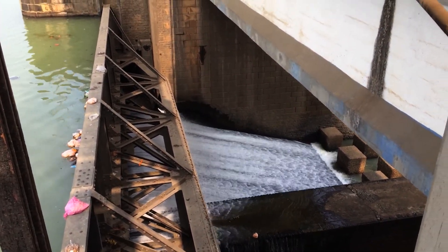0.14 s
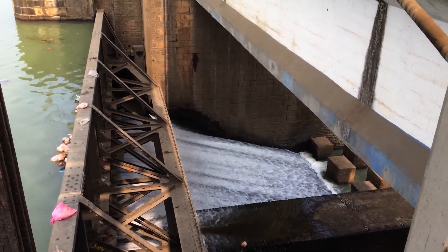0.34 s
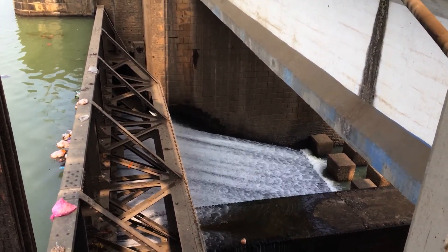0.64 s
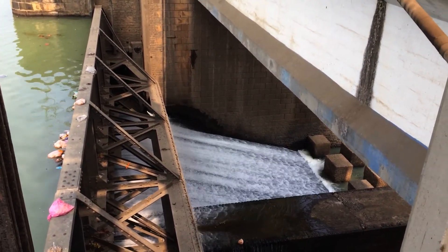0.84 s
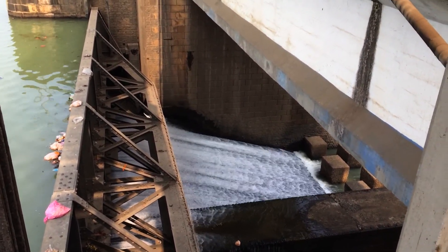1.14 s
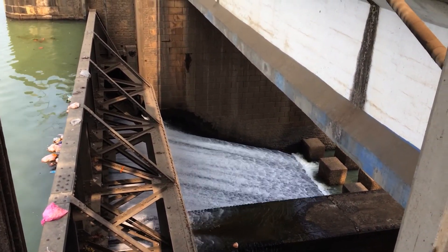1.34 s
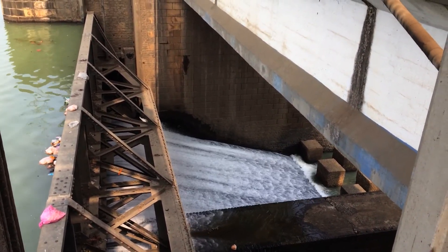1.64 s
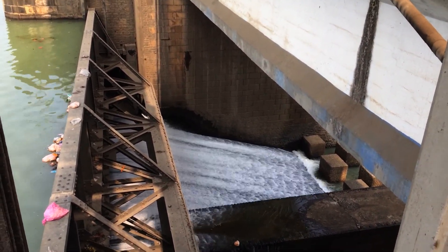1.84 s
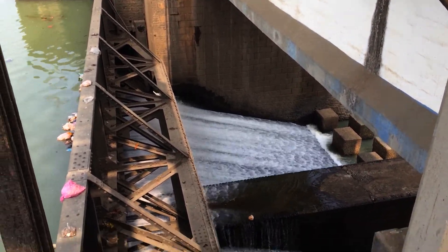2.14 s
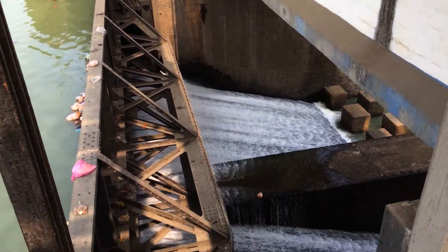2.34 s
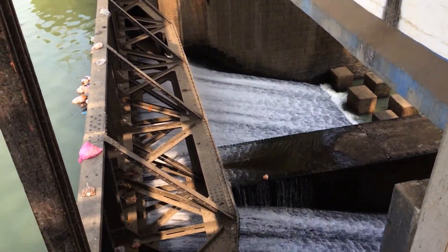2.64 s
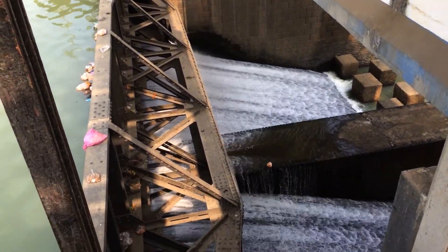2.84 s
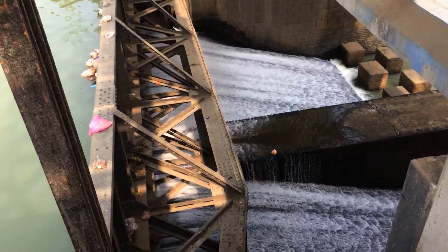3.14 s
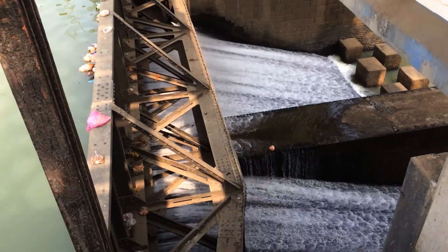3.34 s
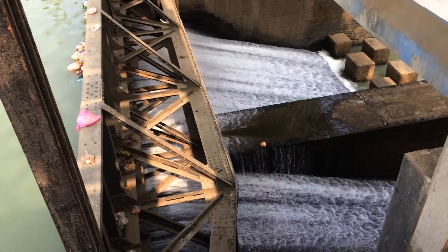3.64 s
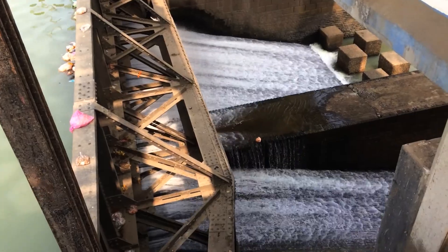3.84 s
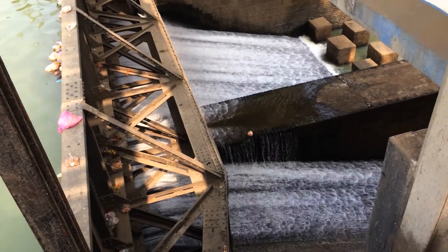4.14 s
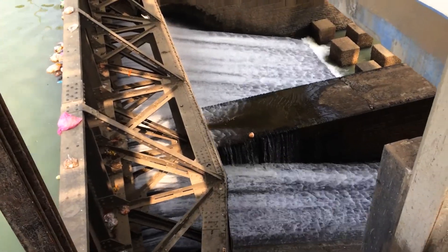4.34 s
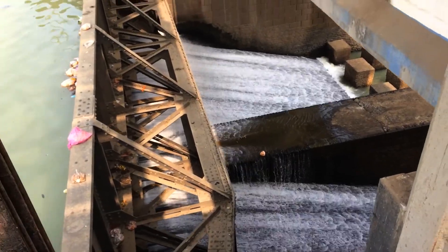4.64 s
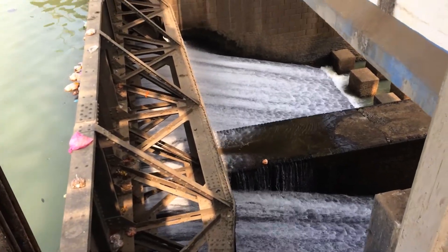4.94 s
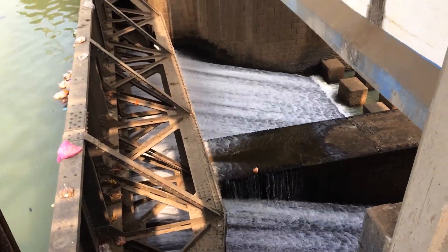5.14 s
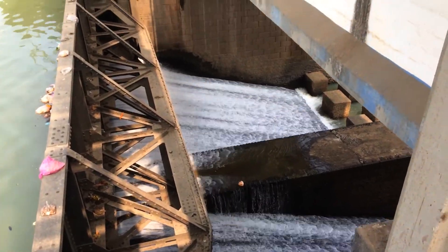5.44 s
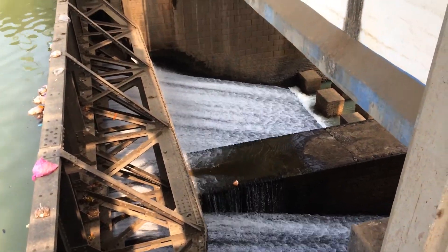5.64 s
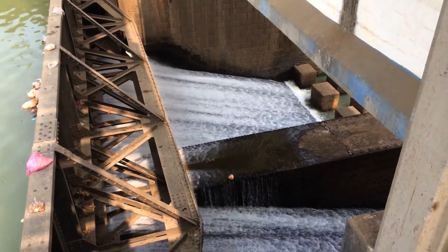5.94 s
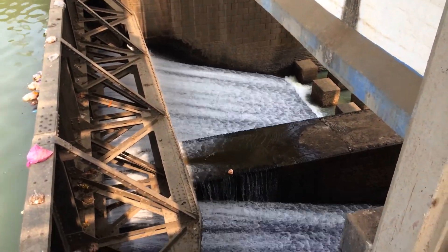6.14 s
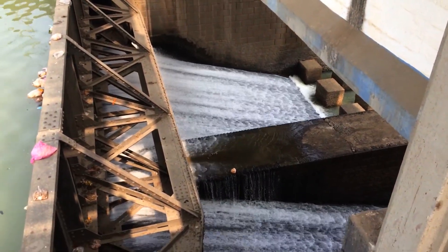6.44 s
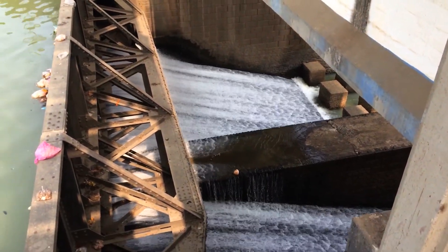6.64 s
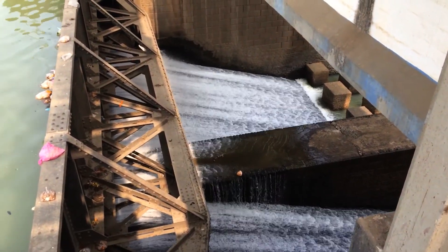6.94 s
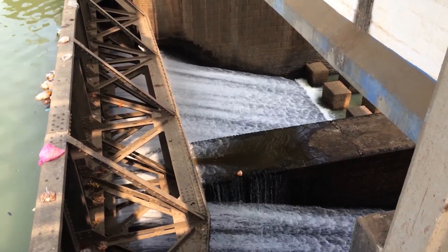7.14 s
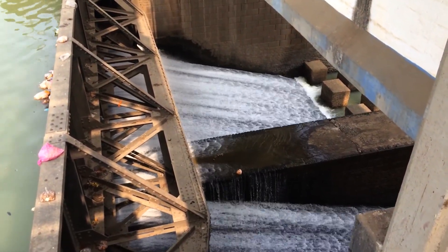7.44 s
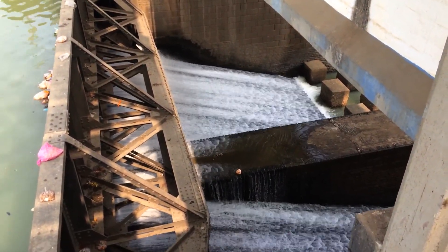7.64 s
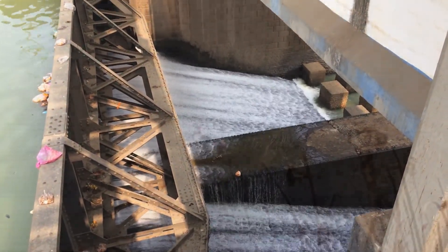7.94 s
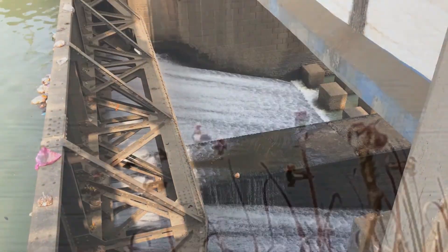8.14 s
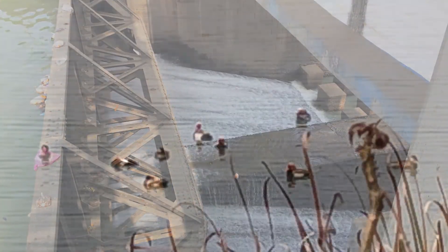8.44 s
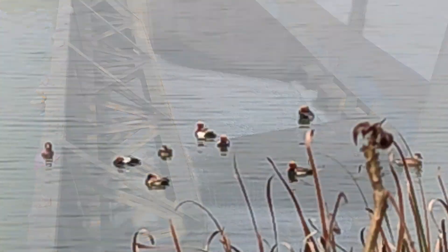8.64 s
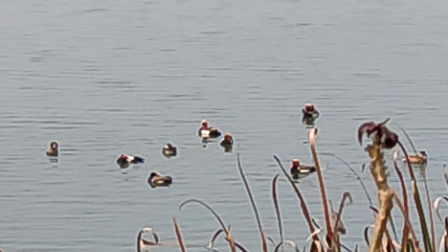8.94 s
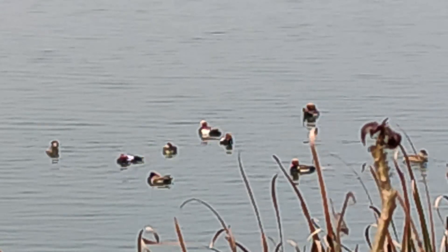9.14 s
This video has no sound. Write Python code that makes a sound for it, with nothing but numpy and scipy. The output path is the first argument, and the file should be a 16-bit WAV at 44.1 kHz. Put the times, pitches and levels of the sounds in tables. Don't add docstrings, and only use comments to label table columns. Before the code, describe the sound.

From 0 s, a loud, dense roar of water plunges down a concrete spillway between piers, covered by bright, fine spray hiss. It is slightly stronger in the first half second, with small splashes near 0.1 and 0.3 s, then very steady. Irregular low gusts thump the microphone throughout, heaviest from 2 to 3.3 s and peaking near 2.8 s, while a low hollow boom swells between the piers. From 2.2 to 6 s the hiss grows gradually brighter. At 8.3 s the water cuts off abruptly, leaving near silence until 8.6 s. Then a very quiet lake: soft wind rumble, distant lapping hush, faint steady motor hum and a thin, fading high insect band. Tiny distant birds peep and glide from 8.9 to 9.15 s, with one dry reed tick at 9.0 s. Nearly mono, with slight flickering compression holes and brief side-to-side patches in the highs.

```python
import sys
import numpy as np
from scipy import signal
from scipy.fft import rfft, irfft
from scipy.io import wavfile
from scipy.ndimage import uniform_filter1d

SR = 44100
rng = np.random.default_rng(int(sys.argv[2]) if len(sys.argv) > 2 else 0)


def ratio(d):
    e = np.asarray(d, float) / 20
    return 10 ** e


def dump(signal):
    limited = np.clip(np.atleast_2d(signal).T, -1, 1)
    pcm = np.round(limited * 32767).astype(np.int16)
    wavfile.write(sys.argv[1], SR, pcm)


N = 410130
LAKE_STARTS_S = 8.6005
FRAME = 1024


def rms_one(x):
    return x / np.sqrt(np.mean(x ** 2) + 1e-20)


def drift(rate):
    every, settle = 40, 2000
    r = np.exp(-2 * np.pi * rate * every / SR)
    coarse = rng.standard_normal(N // every + settle + 2)
    slow = signal.lfilter([1], [1, -2 * r, r * r], coarse)[settle:]
    return np.interp(np.arange(N) / every, np.arange(len(slow)), rms_one(slow))


def coloured(x, spectrum):
    hz = np.fft.rfftfreq(len(x), 1 / SR) + 1e-3
    points = np.array(spectrum)
    level_db = np.interp(np.log(hz), np.log(points[:, 0]), points[:, 1], left=-90)
    return rms_one(irfft(rfft(x) * ratio(level_db), len(x)))


def evened(x, seconds):
    span = int(seconds * SR)
    power = uniform_filter1d(uniform_filter1d(x ** 2, span), span)
    return rms_one(x / np.sqrt(power + .05))


def ramp(start, end):
    return np.clip((np.arange(N) / SR - start) / (end - start), 0, 1)


def bumps(events, seconds, rest_db):
    bass_rise_s = .08
    t = np.arange(0, N + 64, 64) / SR
    power = ratio(rest_db) ** 2
    for s, db in events:
        power = power + ratio(db) ** 2 * np.exp(-((t - s) / seconds) ** 2)
    gain = np.sqrt(power) * (1 - .7 * np.exp(-t / bass_rise_s))
    return np.interp(np.arange(N) / SR, t, gain)


def churn(grain_share, per_s, spread_db, patchy_db, surge):
    sizes = ratio(spread_db * np.minimum(rng.exponential(1, N), 4)) * rng.choice([-1, 1], N)
    bursts = rms_one(sizes * (rng.random(N) < per_s / SR))
    blend = np.sqrt(grain_share) * bursts + np.sqrt(1 - grain_share) * rng.standard_normal(N)
    source = rfft(blend)
    octave = np.log2(np.fft.rfftfreq(N, 1 / SR) + 1)
    out = np.zeros(N)
    for centre in range(7, 15):
        weight = np.cos(np.pi / 2 * np.clip(octave - centre, -1, 1)) ** 2
        out += irfft(source * weight, N) * ratio(patchy_db * drift(15) + surge)
    return out


def plunge_roar(surge, turn):
    # frequency in Hz, level in dB per Hz.
    roar_colour = [(110, -26), (190, 0), (236, -7), (303, -1.5), (409, -7.5), (642, -4.5), (1100, -4),
                   (1520, -3), (2000, -4), (3000, -7.5), (5000, -12), (6500, -26), (11000, -89.5)]
    # time in seconds, lift over the roar in dB.
    splashes = [
        (.105, 1.5),
        (.27, 1.0),
    ]
    roar_db, lean_db, lean_s, splash_s = -32, 1.5, .41, .02
    t = np.arange(N) / SR
    level_db = roar_db + lean_db * np.exp(-t / lean_s) + .5 * turn
    for s, db in splashes:
        level_db += db * np.exp(-((t - s) / splash_s) ** 2)
    return coloured(churn(.28, 3000, 3.35, patchy_db=.68, surge=surge), roar_colour) * ratio(level_db)


def spray_hiss(surge, turn):
    # frequency in Hz, level in dB per Hz.
    spray_colour = [(1760, -12.5), (3000, -5.5), (4500, -5), (5600, -4.5), (7000, -4.5), (10300, -6.5),
                    (12000, -8), (14200, -10), (15000, -12), (16000, -14)]
    spray_db, turn_db = -33, 1.5
    spray = coloured(churn(.2, 9000, 4.8, patchy_db=.5, surge=surge), spray_colour)
    return spray * ratio(spray_db + turn_db * turn)


def gust_thuds():
    # frequency in Hz, level in dB per Hz.
    thud_colour = [(11, -48), (18, -19.5), (35, -11.5), (59, 0.5), (108, 0), (135, -2.5), (170, -26),
                   (290, -89)]
    # time in seconds, peak level in dB.
    gusts = [(0.26, -36.5), (0.53, -36), (0.64, -37.5), (0.91, -39), (1.18, -36.0), (1.49, -36),
             (1.62, -35.0), (1.79, -38.2), (2.03, -34.5), (2.16, -31.5), (2.32, -33), (2.44, -35),
             (2.64, -32.7), (2.79, -28.5), (2.99, -35.5), (3.24, -32.7), (3.67, -37.9), (3.75, -38),
             (3.91, -38.5), (4.46, -33), (5.0, -34), (5.14, -38), (5.22, -38.3), (5.65, -34), (6.18, -38.5),
             (6.26, -36), (6.44, -41), (6.85, -34.5), (7.66, -38.5), (7.96, -34.7)]
    eddies = rng.standard_normal(N) * ratio(2 * drift(25))
    return evened(coloured(eddies, thud_colour), .097) * bumps(gusts, seconds=.035, rest_db=-42)


def pier_boom():
    # frequency in Hz, level in dB per Hz.
    boom_colour = [(74, -29.5), (125, 0.5), (179, -2), (230, -12), (300, -36), (510, -120)]
    # time in seconds, peak level in dB.
    swells = [(.57, -38), (1.22, -36.5), (1.45, -39), (2.0, -39), (2.33, -34), (2.8, -37), (2.89, -37),
              (3.41, -36.5), (4.48, -38.5), (6.01, -38), (6.41, -36.5), (6.84, -36.5), (7.09, -39.5),
              (7.67, -40), (8.05, -36), (8.31, -36.5)]
    boom = evened(coloured(rng.standard_normal(N), boom_colour), .081)
    return boom * bumps(swells, seconds=.03, rest_db=-42)


def spillway():
    turn = ramp(2.2, 6.0)
    surge = .2 * drift(6)
    return plunge_roar(surge, turn) + spray_hiss(surge, turn) + gust_thuds() + pier_boom()


def side_patches():
    # centre in seconds, low edge in Hz, high edge in Hz.
    patches = [(0.187, 4700, 6220), (0.651, 5730, 6860), (0.884, 4310, 6320), (1.023, 8330, 9650),
               (1.302, 5680, 7590), (1.603, 6810, 8330), (1.766, 10290, 13820), (2.207, 5140, 6960),
               (2.347, 9600, 10980), (2.486, 5680, 8230), (2.764, 6860, 9650), (2.997, 4160, 8180),
               (3.09, 5680, 8280), (3.299, 4700, 5730), (3.786, 4160, 5190), (3.809, 6370, 8280),
               (4.738, 6270, 7590), (4.808, 8970, 11070), (4.878, 7640, 10390), (5.075, 8920, 10390),
               (5.295, 6910, 10340), (5.388, 7640, 9600), (5.551, 10290, 11710), (6.758, 4210, 6320),
               (6.921, 6320, 8330), (6.967, 9600, 13080), (7.548, 4650, 7500), (7.617, 9600, 11710),
               (7.896, 8280, 9700), (8.291, 5630, 6900)]
    level_db, tilt_db_per_khz = -41.5, -.3
    side = np.zeros(N + 2 * FRAME)
    bell = np.kaiser(FRAME, 4 * np.pi)
    rise = np.sqrt(np.cumsum(bell) / bell.sum())
    window = np.concatenate([rise, rise[::-1]]) ** 1.5
    hz = np.fft.rfftfreq(2 * FRAME, 1 / SR)
    for s, low_hz, high_hz in patches:
        inside = (hz > low_hz) * (hz < high_hz) * ratio(level_db + tilt_db_per_khz * hz / 1000)
        noise = irfft(rfft(rng.standard_normal(2 * FRAME)) * inside) * np.sqrt(SR / 2000)
        at = round(s * SR) - FRAME
        side[at:at + 2 * FRAME] += noise * window
    return side[:N]


def lake_wind():
    # frequency in Hz, level in dB per Hz.
    wind_colour = [(4, -8), (25, -3), (45, -6), (70, -10), (100, -22), (200, -36), (300, -58), (16000, -66)]
    # time in seconds, level in dB.
    wind_levels = [(8.605, -50), (8.77, -46), (8.93, -46), (8.965, -51), (9.02, -47), (9.185, -52),
                   (9.27, -49), (9.3, -58)]
    wind_db = np.interp(np.arange(N) / SR, *np.transpose(wind_levels))
    return evened(coloured(rng.standard_normal(N), wind_colour), .077) * ratio(wind_db + 5)


def lapping_hush(since_cut):
    # frequency in Hz, level in dB per Hz.
    hush_colour = [(59, -30), (100, 1.5), (275, -8.5), (366, -5.5), (606, -17.5), (717, -14), (821, -20),
                   (955, -13), (1320, -26), (1430, -18), (1560, -23.5), (2110, -20), (3270, -22.5),
                   (5600, -38), (7280, -67), (12300, -120)]
    hush_db, rise_db_per_s = -54.5, 2.5
    return coloured(rng.standard_normal(N), hush_colour) * ratio(hush_db + rise_db_per_s * since_cut)


def insects(since_cut):
    # frequency in Hz, level in dB per Hz.
    insect_colour = [(3060, -49), (5200, -24), (6000, -14), (6700, -14), (8250, 4), (9150, -10),
                     (10000, -16), (11600, -22), (14400, -24), (16000, -34)]
    insects_db, fade_db_per_s = -62.5, 6
    trembling = rng.standard_normal(N) * ratio(1.2 * drift(70))
    return coloured(trembling, insect_colour) * ratio(insects_db - fade_db_per_s * since_cut)


def motor_hum():
    # frequency in Hz, level in dB.
    hum_lines = [
        (708, -66),
        (973.6, -82),
        (1443, -85),
    ]
    t = np.arange(N) / SR
    return sum(ratio(db + 3.5) * np.sin(2 * np.pi * hz * t + .3 * drift(3)) for hz, db in hum_lines)


def birds():
    # start in seconds, end in seconds, start pitch in Hz, end pitch in Hz, level in dB.
    bird_notes = [
        (8.905, 8.935, 2100, 2120, -75),
        (8.967, 9.01, 3170, 3230, -71),
        (9.002, 9.03, 2850, 3050, -74),
        (8.998, 9.092, 3200, 4750, -79),
        (9.02, 9.052, 2130, 2080, -75),
        (9.102, 9.133, 3780, 3680, -71),
        (9.11, 9.145, 2400, 2320, -77),
    ]
    t, out = np.arange(N) / SR, np.zeros(N)
    wobble, flutter = drift(150), drift(90)
    for start, end, from_hz, to_hz, level_db in bird_notes:
        part = np.clip((t - start) / (end - start), 0, 1)
        hz = (from_hz + (to_hz - from_hz) * part) * (1 + .012 * wobble)
        whistle = np.sin(2 * np.pi * np.cumsum(hz) / SR)
        out += ratio(level_db + 10 + 2 * flutter) * np.sin(np.pi * part) ** .6 * whistle
    return out


def reed_tick():
    # frequency in Hz, level in dB per Hz.
    tick_colour = [(2000, -30), (4500, -5), (9500, 1), (12500, -6), (15700, -22)]
    # time in seconds, decay in seconds, level in dB.
    tick_event = (9.004, 0.0055, -59)
    at, decay, tick_db = tick_event
    since = np.maximum(np.arange(N) / SR - at, 0)
    envelope = since / decay * np.exp(1 - since / decay)
    return coloured(rng.standard_normal(N), tick_colour) * envelope * ratio(tick_db)


def lake():
    since_cut = np.arange(N) / SR - LAKE_STARTS_S
    return (lake_wind() + lapping_hush(since_cut) + insects(since_cut) + motor_hum()
            + birds() + reed_tick())


def camera_rounding(x, scatter_db):
    # frequency in Hz, dB over the fall, dB at the lake.
    step_sizes = [(500, -56, -80), (1300, -54, -64), (4000, -48, -63), (4900, -46, -57), (6600, -43, -57),
                  (8500, -40, -62), (10700, -38, -61), (13000, -33, -65.5), (15500, -28, -68)]
    rich_from_s, rich_to_s, rich_db, later_db = 1.0, 2.8, -7.5, 1.2
    offset, band = 300, 16
    frames = N // FRAME + 3
    blocks = np.pad(x, (FRAME + offset, 4 * FRAME))[:(frames + 1) * FRAME].reshape(-1, FRAME)
    n, k = np.arange(2 * FRAME), np.arange(FRAME)
    window = np.sin(np.pi * (n + .5) / (2 * FRAME))
    waves = np.cos(np.pi / FRAME * np.outer(k + .5, n + .5 + FRAME / 2))
    basis = np.sqrt(2 / FRAME) * window * waves
    lines = np.hstack([blocks[:-1], blocks[1:]]) @ basis.T

    hz, fall_db, lake_db = np.transpose(step_sizes)
    s = np.arange(frames)[:, None] * FRAME / SR
    line_hz = (k + .5) * SR / 2 / FRAME
    change_db = rich_db * (s > rich_from_s) * (s < rich_to_s) + later_db * (s > rich_to_s)
    over_fall = np.interp(line_hz, hz, fall_db) + change_db
    step_db = np.where(s < LAKE_STARTS_S - .1, over_fall, np.interp(line_hz, hz, lake_db))
    per_band = rng.standard_normal((frames, FRAME // band)) + .5 * rng.standard_normal((frames, 1))
    step = ratio(step_db + scatter_db * np.repeat(per_band, band, axis=1))

    rounded = np.sign(lines) * np.floor(np.abs(lines) / step + .4) * step
    halves = rounded @ basis
    out = halves[:-1, FRAME:] + halves[1:, :FRAME]
    return out.ravel()[offset:offset + N]


def scene():
    fall_ends_s, tail_ends_s, tail_db = 8.3262, 8.341, -33
    t = np.arange(N) / SR
    places = np.where(t < LAKE_STARTS_S - .13, spillway(), lake())
    stored = camera_rounding(places, scatter_db=3)
    remnant = ratio(tail_db) * (t >= fall_ends_s) * np.clip((tail_ends_s - t) / .0044, 0, 1)
    fall_gate = (t < fall_ends_s) + remnant
    lake_gate = np.clip((t - LAKE_STARTS_S) / .003, 0, 1)
    mono = stored * (fall_gate + lake_gate)
    return np.array([mono, mono])


def roll_off(x):
    return signal.sosfilt(signal.butter(12, 15780, fs=SR, output="sos"), x)


def record(dry):
    mix = dry + side_patches() * [[1], [-1]]
    return roll_off(mix)


dry = scene()
out = record(dry)
dump(out)
```